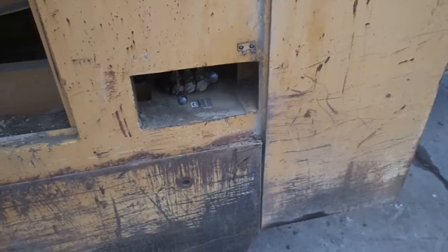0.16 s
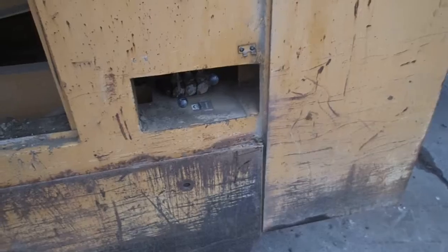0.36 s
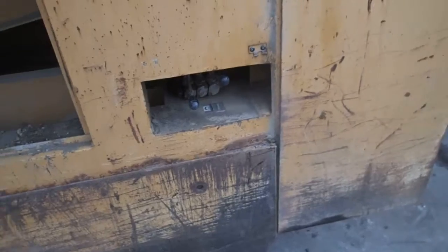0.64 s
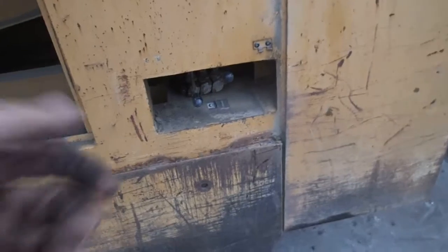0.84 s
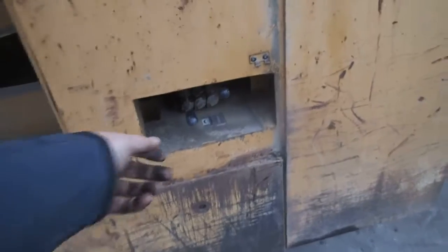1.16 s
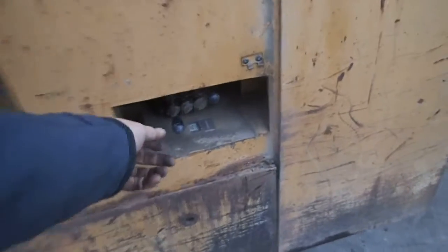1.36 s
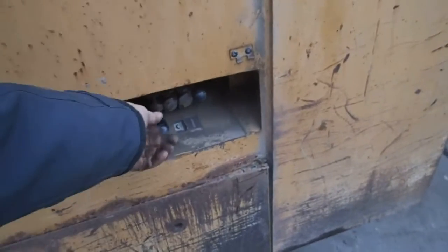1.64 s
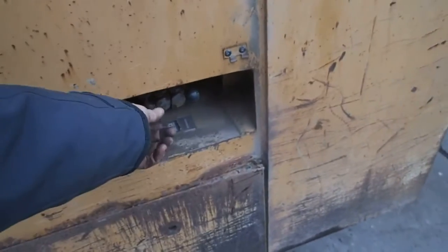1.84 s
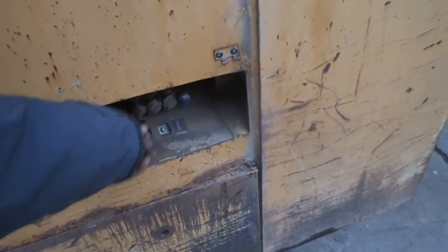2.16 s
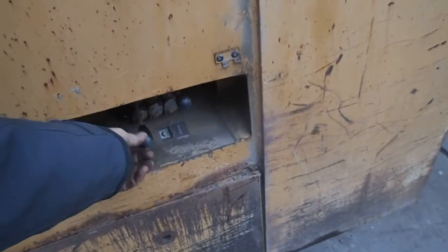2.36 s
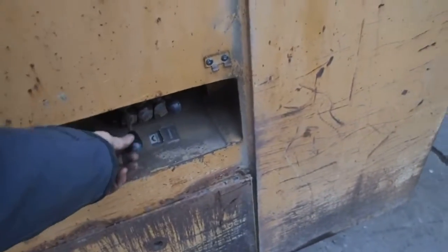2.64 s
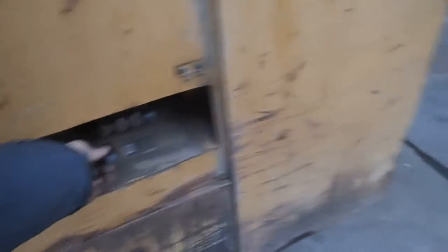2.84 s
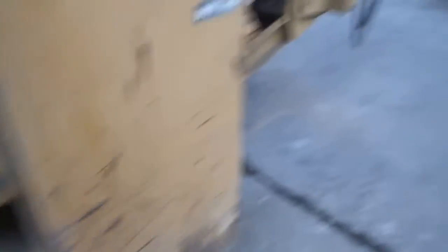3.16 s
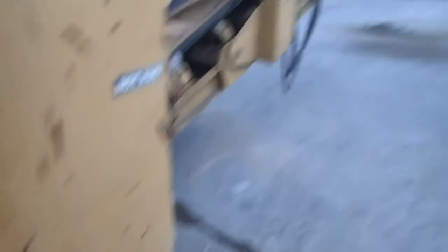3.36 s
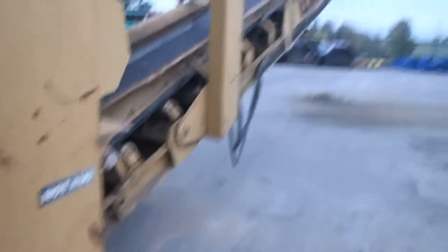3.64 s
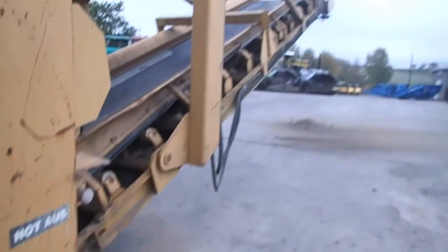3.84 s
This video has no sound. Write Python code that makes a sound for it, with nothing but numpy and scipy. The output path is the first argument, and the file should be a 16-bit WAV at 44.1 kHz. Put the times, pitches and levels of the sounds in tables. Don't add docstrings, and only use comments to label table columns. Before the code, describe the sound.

Screening machine rattles loudly, loose steel clattering in fast strokes over engine roar and low drone.

```python
import sys
import numpy as np
from scipy import signal
from scipy.fft import rfft, irfft
from scipy.io import wavfile
from scipy.ndimage import uniform_filter1d

SR = 44100
rng = np.random.default_rng(int(sys.argv[2]) if len(sys.argv) > 2 else 0)


def unload_audio(sound):
    columns = np.transpose(np.atleast_2d(sound))
    steps = np.round(np.clip(columns, -1, 1) * 32767)
    wavfile.write(sys.argv[1], SR, steps.astype(np.int16))


def gain_from_db(level_db):
    decades = np.asarray(level_db, float) / 20
    return 10 ** decades


N = 176400

TURN_HZ = 13.825
START_S = 0.2587

# multiple_of_turn, level_db
DRONE_PARTIALS = [(3, -50), (4, -52), (5, -46), (6, -45), (7, -37.5), (8, -32.5), (9, -39), (10, -34.5),
                  (13, -41), (15, -40), (18, -37), (19, -35.5), (20, -38.5), (21.5, -39), (24, -34.5),
                  (27, -41.5), (30, -35.5), (31, -42), (39, -49.5)]
# time_s, pitch_hz, level_db
PUMP_HUM = [
    (0.3, 342, -38),
    (0.65, 343.9, -27),
    (2.46, 342.1, -26.5),
    (3.21, 343, -35),
    (3.31, 338.5, -31),
    (4.0, 342.3, -31.5),
]
# time_s, level_db
PUMP_OCTAVE = [
    (0, -43),
    (2, -38),
    (3, -38),
    (4, -44.5),
]
# time_s, level_db
PANEL_LEVEL = [
    (0, -78),
    (1.6, -48),
    (2.5, -38),
    (3.4, -36),
    (4, -52),
]
# frequency_hz, density_db
ROAR_SPECTRUM = [(15, -51), (25, -34.5), (103, -2), (252, -3), (539, -7.5), (1700, -15.5), (1870, -20),
                 (2060, -19.5), (2600, -29.5), (3380, -37), (5720, -120)]
# time_s, bass_db, middle_db
FACING = [
    (0, -20.5, -2),
    (.7, -21.5, 1),
    (1.3, -21.5, -0.5),
    (2.2, -21.5, -1),
    (2.8, -21, 0),
    (3.4, -22, 2),
    (4, -24, 5.5),
]
# frequency_hz, density_db
RATTLE_SPECTRUM = [(500, -9), (1000, -7), (1700, -4.5), (2200, -8.5), (2700, -14.5), (3100, -11.5), (3650, -12),
                   (4000, -19.5),
                   (4200, -17), (4550, -6.5), (5120, 1), (6600, -9.5), (8000, -11), (9810, -24), (12400, -31.5),
               (14800, -28)]
# frequency_hz, share
STROKE_SWING = [(700, 0.37), (1500, 1.4), (3000, 0.84), (5500, 0.92), (8000, 1.21), (13000, 0.79)]
# peak_s, peak_db
KNOCKS = [(0.2987, -30), (0.38, -6), (0.5106, -4), (0.5904, -15), (0.658, -14), (0.7253, -17), (0.87, -18),
          (1.0884, -17), (1.3957, -20), (1.6746, -13), (1.8901, -14), (2.0298, -21), (2.1849, -25),
          (2.3196, -27), (2.397, -16), (2.5167, -1), (2.5494, -7), (2.6189, -13), (2.6843, -13),
          (2.821, -17), (2.8973, -13), (3.0424, -25), (3.1133, -35), (3.1847, -12), (3.2645, -14),
          (3.3328, -9), (3.6207, -13), (3.7813, -8), (3.906, -10), (3.9809, -3.5)]
# frequency_hz, likeness
PORT_LIKENESS = [(60, .98), (1500, .975), (3800, .955), (4500, .83), (5300, .89), (7000, .74), (10000, .55),
                 (15000, .1)]
# frequency_hz, lead_rad
LEFT_LEAD = [(30, 0.067), (4000, 0), (6600, 0.68), (9000, 0.63), (11000, 1.3), (14500, 1.6)]
# frequency_hz, level_db
LEFT_LEAN = [(60, 1.8), (150, 2.2), (400, 2.3), (800, 1.3), (2400, 0.54), (4400, 2.1), (8100, .1),
             (15000, 1.2)]
# frequency_hz, width_hz, depth (0-1)
HOUSING_DIPS = [
    (1894, 124, 0.8),
    (3410, 250, 0.6),
    (4830, 116, 1),
]


def rms_one(x):
    return x / np.sqrt(np.mean(x ** 2) + 1e-20)


def in_time(rows):
    s, *columns = np.transpose(rows)
    return [np.interp(np.arange(N) / SR, s, column) for column in columns]


def at_hz(points, hz):
    table_hz, values = np.transpose(points)
    return np.interp(np.log(hz), np.log(table_hz), values)


def bins():
    return np.maximum(np.arange(N // 2 + 1) * SR / N, 1)


def split_bands(spectrum, edges_hz):
    hz = bins()
    for low, high in zip(edges_hz, edges_hz[1:]):
        yield low, high, irfft(spectrum * ((hz >= low) & (hz < high)), N)


def drift(rate_hz):
    r = np.exp(-80 * np.pi * rate_hz / SR)
    slow = signal.lfilter([1], [1, -2 * r, r * r], rng.standard_normal(N // 40 + 2002))[2000:]
    slow = rms_one(slow - slow.mean())
    return np.interp(np.arange(N) / 40, np.arange(len(slow)), slow)


def colour(x, spectrum):
    return rms_one(irfft(rfft(x) * gain_from_db(at_hz(spectrum, bins())), N))


def turns():
    return TURN_HZ * np.arange(N) / SR


def start_jolt(since_s):
    swing = np.sin(np.pi * since_s / 0.0012)
    return -gain_from_db(1.5) * swing * np.exp(-since_s / 0.0016) * [[0], [1]]


def stroke_level_db():
    rise, fall = 0.12, 0.64
    since_stroke = turns() + 0.04
    place = since_stroke % 1
    thinning = np.clip((place - rise) / fall, 0, 1) ** 1.9
    shape = np.where(place < rise, 1 - place / rise, thinning)
    strength_db = rng.normal(0, 0.73, 80)[since_stroke.astype(int)]
    return -6.5 * (shape - 0.5) + uniform_filter1d(strength_db, size=400) + 0.85 * drift(27)


def knock_level():
    rise_s, fade_s, boost_db = 0.0007, 0.0046, 9
    hits = np.zeros(N)
    for peak_s, db in KNOCKS:
        hits[int((peak_s - rise_s) * SR)] = gain_from_db(db + boost_db)
    fading = signal.lfilter([1], [1, -np.exp(-1 / fade_s / SR)], hits + 1e-18)
    soft = np.exp(-1 / rise_s / SR)
    return signal.lfilter([1 - soft], [1, -soft], fading)


def steel_ticks():
    ticks_per_s, spread_db = 4000, 2.54
    sizes = gain_from_db(spread_db * np.minimum(rng.exponential(1, N), 6))
    sizes = sizes * (rng.random(N) < ticks_per_s / SR)
    ticks = sizes * rng.choice([-1, 1], (2, N))
    return rms_one(ticks) + rng.standard_normal((2, N))


def rattle():
    gain = gain_from_db(stroke_level_db()) + knock_level()
    echo_share = np.array([[1], [0.63]])
    edges_hz = 300 * 2 ** np.arange(0, 6.1, 0.75)
    out = 0
    for low, high, band in split_bands(rfft(steel_ticks()), edges_hz):
        share = at_hz(STROKE_SWING, np.sqrt(low * high)) * echo_share
        swung = gain ** share * gain_from_db(0.8 * drift(16.3))
        out = out + rms_one(swung) * band
    spectrum = [(200, -39)] + RATTLE_SPECTRUM + [(16500, -42)]
    return gain_from_db(-25) * colour(out, spectrum)


def drone():
    out = 0
    for multiple, db in DRONE_PARTIALS:
        thump = 0.189 if multiple < 12 else 0.55
        phase = 2 * np.pi * multiple * (turns() - thump)
        phase = phase + rng.normal(0, 0.39) + 0.53 * drift(1.4)
        out = out + gain_from_db(db + 3.5 + 2 * drift(2.5)) * np.cos(phase)
    return out


def roar():
    bass_db, middle_db = in_time(FACING)
    noise = colour(rng.standard_normal((2, N)), ROAR_SPECTRUM + [(4000, -70)])
    edges_hz = 20 * 2 ** np.arange(0, 8.1, 2 / 3)
    out = 0
    for low, high, band in split_bands(rfft(noise), edges_hz):
        out = out + band * gain_from_db(1.5 * drift(4.2) + middle_db * (low > 440))
    return gain_from_db(bass_db) * out


def pump():
    pitch_hz, level_db = in_time(PUMP_HUM)
    octave_db, = in_time(PUMP_OCTAVE)
    phase = 2 * np.pi * np.cumsum(pitch_hz) / SR
    hum = gain_from_db(level_db + 1.25 * drift(3)) * np.sin(phase)
    return hum + gain_from_db(octave_db + 4 + 1.5 * drift(5)) * np.sin(2 * phase)


def wind():
    low_band = signal.butter(2, [15, 32], "band", fs=SR, output="sos")
    return gain_from_db(-53) * rms_one(signal.sosfilt(low_band, rng.standard_normal((2, N))))


def panel():
    pitch_hz, width_hz = 1233, 13
    r = np.exp(-np.pi * width_hz / SR)
    resonance = [1, -2 * r * np.cos(2 * np.pi * pitch_hz / SR), r * r]
    ring = signal.lfilter([1, 0, -1], resonance, rng.standard_normal(N))
    return gain_from_db(in_time(PANEL_LEVEL)[0]) * rms_one(ring)


def ports(shared, apart):
    hz = bins()
    alike = at_hz(PORT_LIKENESS, hz)
    mid = rfft(shared) * np.sqrt((1 + alike) / 2)
    side = rfft(apart) * np.sqrt((1 - alike) / 2)
    skew = gain_from_db(at_hz(LEFT_LEAN, hz) / 2) * np.exp(0.5j * at_hz(LEFT_LEAD, hz))
    return irfft(np.array([(mid + side) * skew, (mid - side) / skew]), N)


def scene():
    shared, apart = rattle() + roar()
    return ports(shared + drone() + pump() + panel(), apart) + wind()


def band_limit(x):
    return signal.sosfilt(signal.butter(12, 15780, fs=SR, output="sos"), x)


def record(dry):
    x = dry
    for hz, width_hz, depth in HOUSING_DIPS:
        x = x - depth * signal.lfilter(*signal.iirpeak(hz, hz / width_hz, SR), x)
    t = np.arange(N) / SR - START_S
    since_s = np.maximum(t, 0)
    opening = np.clip((t - [[0.0009], [0]]) / 0.00026, 0, 1)
    settling = gain_from_db(2 * np.exp(-since_s / 0.48))
    mix = np.tanh(x * opening * settling) + start_jolt(since_s)
    return band_limit(mix)


dry = scene()
out = record(dry)
unload_audio(out)
```